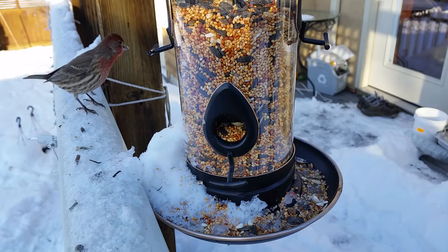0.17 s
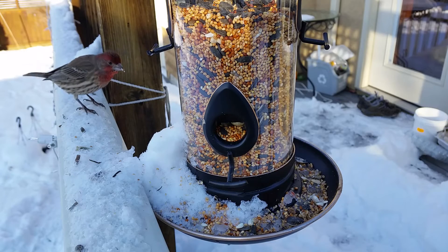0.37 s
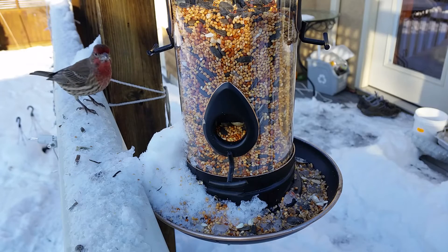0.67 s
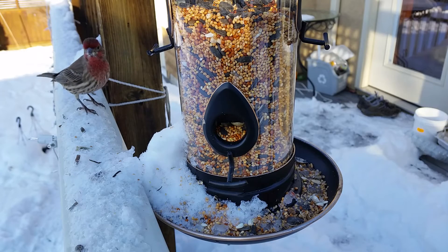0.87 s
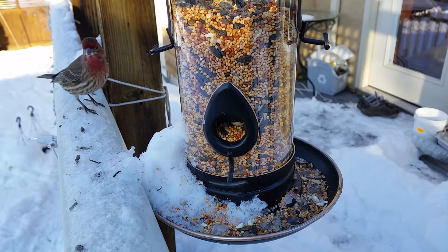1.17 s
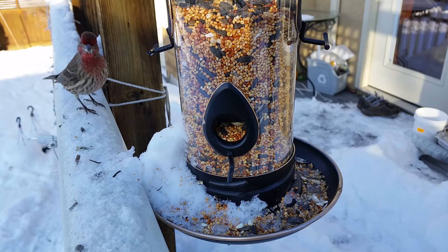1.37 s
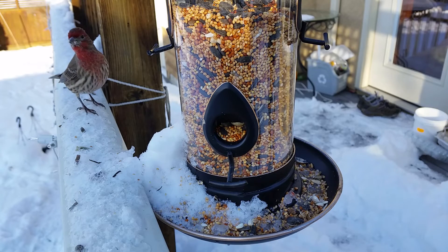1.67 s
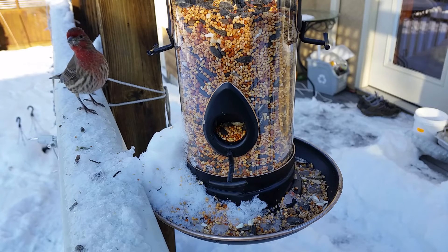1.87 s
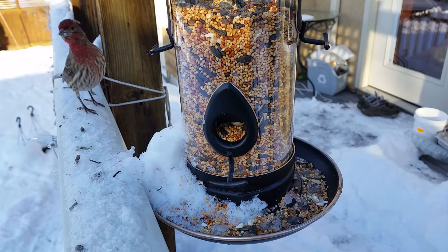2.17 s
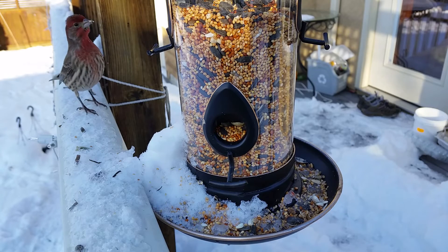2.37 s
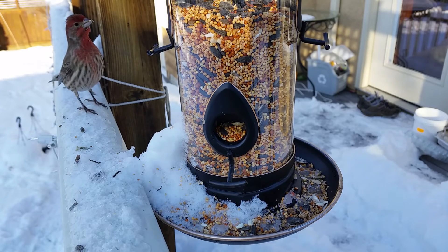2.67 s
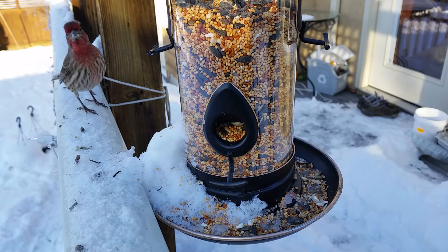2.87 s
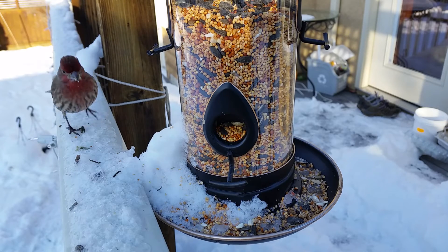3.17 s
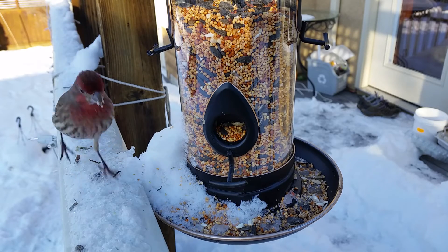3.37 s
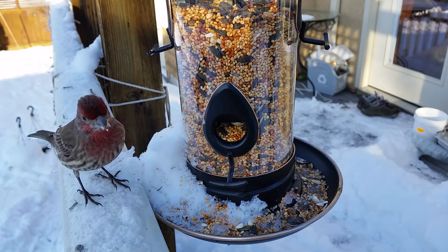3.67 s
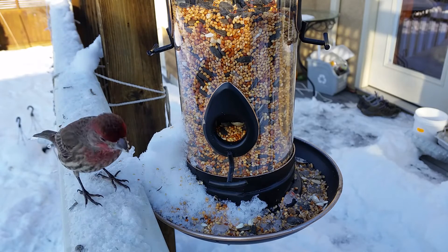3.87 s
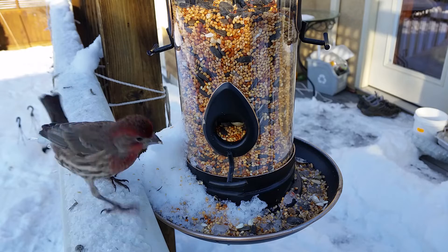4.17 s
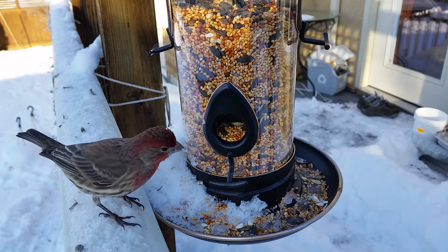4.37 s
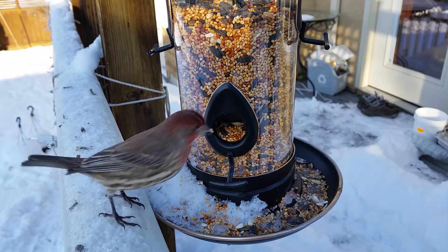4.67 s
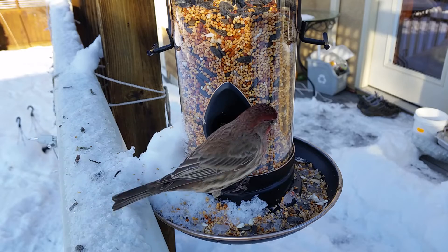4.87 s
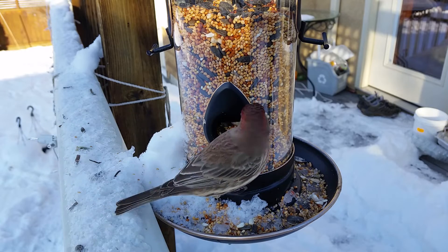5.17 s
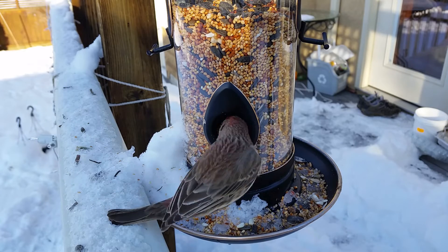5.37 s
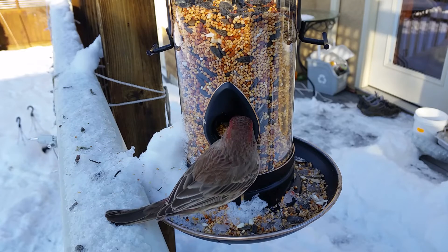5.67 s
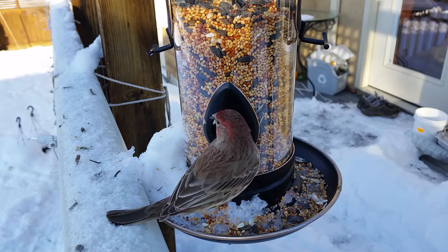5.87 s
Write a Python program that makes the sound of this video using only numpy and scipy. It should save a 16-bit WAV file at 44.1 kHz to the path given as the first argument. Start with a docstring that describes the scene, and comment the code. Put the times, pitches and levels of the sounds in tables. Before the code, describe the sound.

A smooth bass hum from an overhead plane dominates, wavering gently and growing stronger towards the end, over dull roar and soft road noise. One very brief, bright, gliding finch call sounds close by near the midpoint. Dry claw and beak ticks on rail and feeder follow, some with a tiny wire ring, plus barely audible scuffs. Far birds peep faintly last. Open yard, stereo microphone near the bird, with only a short thin echo.

```python
"""A propeller plane drones over a snowy yard from the start, its blade note sinking as it flies past.
Tyres and engine of a passing car are noise and two low tones; claw ticks are scratches that ring a rail.
At 2.9 s a close finch calls once: gliding harmonics with a second voice beating against them.
Then it hops and pecks at a seed feeder, with more ticks and soft scuffs of noise.
Near the end, from 5.6 s, far birds peep in short gliding notes."""
import sys
import numpy as np
from scipy import signal
from scipy.io import wavfile
from scipy.ndimage import uniform_filter1d

SR = 44100
rng = np.random.default_rng(int(sys.argv[2]) if len(sys.argv) > 2 else 0)


def master(y):
    """Save y as 16-bit WAV."""
    cut = np.clip(np.atleast_2d(y).T, -1, 1)
    pcm = np.round(cut * 32767)  # scale
    wavfile.write(sys.argv[1], SR, pcm.astype(np.int16))


N = 265129

# The blade note swells and fades along the air path: start_s, level_db
BLADE_LEVEL = [(0.04, -23), (0.24, -20.5), (0.5, -21.5), (0.75, -18), (0.92, -20.5), (1.52, -19),
               (1.69, -27.5), (2.07, -20), (2.29, -22.5), (2.32, -20.5), (3.06, -21.5), (3.23, -19),
               (3.49, -23), (3.62, -20), (3.95, -21.5), (4.18, -17), (4.4, -18.5), (5.21, -14.5),
               (5.34, -12), (5.57, -13.5), (5.89, -12), (5.97, -13.5)]
# Its 2nd and 4th harmonics fade in and out as well: start_s, second_db, fourth_db
BLADE_HARMONICS = [(0, -39, -48), (.35, -32, -38), (.62, -42, -44), (.85, -33.5, -43.5), (1.15, -41.5, -54),
                   (1.4, -37.5, -39), (1.6, -38, -44.5), (1.82, -44.5, -36.5), (2.0, -29.5, -43.5),
                   (2.2, -29.5, -38), (2.42, -31.5, -52), (2.62, -39, -56), (2.7, -32.5, -59),
                   (2.8, -41.5, -58), (3.18, -33.5, -51), (3.3, -37, -62), (3.65, -39, -65),
                   (3.85, -46, -67), (4.0, -38, -61), (4.4, -38, -50.5), (4.6, -40, -66),
                   (4.8, -36.5, -63.5), (5.1, -37.5, -48), (5.4, -33.5, -62), (5.65, -43.5, -58.5),
                   (6.01, -56.5, -41)]
# The plane's broad roar, before a common trim: start_s, level_db, top_weight_db
ROAR = [(0, -33, 0.5), (.33, -28.5, 0.5), (.7, -27, -3.5), (1.0, -28, -1.5), (1.45, -26, -1),
        (1.75, -28, -0.5), (2.2, -29.5, 4.5), (2.7, -35.5, 5), (3.2, -33, 3.5), (3.8, -32.5, 2.5),
        (4.4, -28, -0.5), (5.0, -31, 1.5), (5.35, -27.5, -3.5), (5.7, -33, 1.5), (6.01, -26, -3.5)]
# Shape of the roar's spectrum: frequency_hz, relative_db (per Hz)
ROAR_COLOUR = [(25, -38), (45, -17.5), (80, -3), (140, -7), (190, 1), (250, -4), (320, -4.5), (450, -11.5),
               (620, -14), (900, -24), (1500, -37), (3000, -49.5), (6000, -69.5)]
# Tyres of the passing car, before a common trim: start_s, level_db, tread_band_db
TYRES = [(0, -60.5, 3.5), (.75, -57.5, -3), (1.4, -57, -3.5), (2.05, -51.5, -1), (3.04, -49, 8),
         (3.61, -50, 6), (3.91, -52.5, 6), (4.39, -52, 3), (4.78, -54, 2), (5.73, -58.5, 4),
         (6.01, -62, 8.5)]
# Shape of the tyre spectrum: frequency_hz, relative_db (per Hz)
TYRE_COLOUR = [(300, -29.5), (550, -4.5), (750, -3.5), (1100, -6.5), (1600, -7.5), (2400, -13),
               (3500, -18.5), (5000, -24.5), (8000, -39), (14000, -53)]
# The car's engine, which ends slower than it began: start_s, firing_rate_hz, level_db
ENGINE = [(0, 40.4, -48), (.6, 41.8, -42.5), (1.2, 43.4, -43.5), (2.5, 41.5, -42), (3.15, 37.4, -43),
          (3.8, 35.3, -42), (4.25, 30.2, -49), (5.1, 28.3, -49), (6.01, 27.15, -51.5)]
# Shape of the microphone hiss: frequency_hz, relative_db (per Hz)
HISS_COLOUR = [(1500, -7.5), (4000, 3), (8000, -0.5), (13000, -6.5), (14300, -5.5), (14900, -15.5),
               (15600, -20)]
# How alike the noise is in both channels: frequency_hz, likeness (1 same, 0 unrelated, below 0 opposed)
LIKENESS = [(30, 1), (60, 0.83), (290, 0.92), (640, 0.76), (1400, 0.53), (3100, 0.072), (6800, -0.17),
            (15000, -0.2)]
# How much louder the noise is on the left: frequency_hz, left_minus_right_db
NOISE_LEAN = [(30, 0), (60, 1.5), (200, -0.5), (400, 2), (700, 2.5), (1300, 1.4), (2400, 1.5), (5000, 0.5),
              (10000, 0.5)]
# The finch's call glides down, then holds:
# start_s, pitch_hz, first_harmonic_db, second_harmonic_db, drop_per_higher_harmonic_db
CALL = [(2.881, 3994, -65, -78, 15), (2.887, 3830, -45, -58, 25), (2.895, 3640, -44, -55, 17),
        (2.905, 3496, -38, -49, 6), (2.911, 3310, -25.5, -48, 5), (2.918, 3057, -23.5, -50, 1),
        (2.926, 2884, -34, -34.5, 7), (2.934, 2760, -33, -36, 10), (2.938, 2710, -29, -35, 9),
        (2.945, 2750, -57, -38, 5.5), (2.953, 2760, -34, -36, 15), (2.957, 2720, -37, -43, 14),
        (2.964, 2820, -50, -46, 18), (2.968, 2790, -49, -54, 25), (2.974, 2750, -52, -64, 27),
        (2.988, 2770, -48, -64, 25), (2.997, 2750, -64, -78, 25)]
# The other side of its voice box, beating against the first: start_s, pitch_hz, level_db
SECOND_VOICE = [(2.887, 3100, -60), (2.893, 3100, -47), (2.901, 3130, -34), (2.908, 3093, -27.5),
                (2.914, 3040, -30), (2.921, 2950, -50)]
# Far birds: start_s, length_s, first_pitch_hz, last_pitch_hz, level_db
PEEPS = [(5.617, 0.027, 4640, 4500, -61.5), (5.63, 0.017, 4000, 3990, -59.5),
         (5.856, 0.029, 3420, 3100, -62.5), (5.886, .016, 2880, 2980, -63),
         (5.885, 0.022, 3150, 3700, -58.5), (5.908, 0.035, 3870, 4000, -65)]
# Claws and beak; low and high parts are weighed against the middle part:
# start_s, level_db, low_part_db, high_part_db, left_minus_right_db, fade_s, wire_ring_db
TICKS = [(0.553, -44, -14, -9, 3, 0.0036, -32), (0.5574, -38.5, -2, -5.5, 0, 0.0039, -30),
         (0.564, -53, 2, -5, 0, 0.0061, -25), (1.485, -56, -6, 2, 1, 0.0025, -28),
         (1.554, -53, -7, -15, 0, 0.0021, -29), (2.006, -56, -10, -1, 1, .0015, -30),
         (2.236, -39.5, -12, -14, 0, 0.0027, -17), (3.0805, -51, -20, -10, 5, 0.0015, 3),
         (3.0855, -59, -20, 9, 6, .0012, -32), (3.1432, -45, 4, -20, 5, 0.0013, -20),
         (3.145, -40, 4, -13, 7, 0.0011, -6), (3.322, -56, -13, -10, 0, 0.004, -19),
         (3.328, -50.5, -6, -8, 8, 0.0036, 0), (3.465, -57, -11, -10, 8, .0015, 3),
         (3.467, -55.5, -11, -4, 8, .002, 9), (3.5015, -49.5, 1, -18, 7, 0.0018, 3),
         (3.6133, -48, -6, -10, 5, .0015, -6), (4.2705, -53, -4, -14, 1, 0.0023, 3),
         (4.277, -61, -4, 5, 3, .002, -12), (4.284, -58, -3, 4, 3, .002, -10),
         (4.306, -52, 6, -8, 8, 0.003, -4), (4.312, -59, -5, 7, 3, .0015, -20),
         (4.8195, -48.5, 10.5, -16, 1, 0.0022, -34), (4.8265, -61, 16, -22, 4, 0.0017, -34),
         (5.45, -59, -9, 6, 1.5, 0.00143, -32), (5.493, -49, -9, -6, -1, 0.0013, -30),
         (5.499, -64, -5, 8, 0.1, .0015, -32), (5.55, -45, -10, -6, 3, 0.0018, -30),
         (5.553, -53, 1, 3, 1, 0.0025, -29.5), (5.597, -42.5, -9, -9, 3.5, 0.001, -30),
         (5.648, -49, 5, -9.5, 4, 0.0033, -26.5), (5.655, -60.5, -4, 5, -4, .002, -28),
         (5.701, -54, -8.5, -1, 9.5, 0.0013, -30.5)]
# Low, middle and high part of a tick: lowest_hz, highest_hz
TICK_PARTS = [(1500, 4300), (3600, 7500), (6500, 13500)]
# The rail and tray ring briefly under each tick: frequency_hz, width_hz, strength_db
RAIL_RESONANCES = [(1820, 260, -5), (2500, 600, 0), (3300, 700, -5), (4250, 400, 1), (5380, 800, 0),
                   (6900, 900, -5)]
# Feet and feathers scuffing snow and seed: middle_s, level_db, half_length_s
SCUFFS = [(3.173, -67, 0.0091), (3.332, -58.5, 0.008), (3.474, -61, .01), (3.508, -64, .008),
          (4.279, -67, 0.02), (4.313, -65, 0.012), (5.365, -63, 0.026), (5.47, -69, .04),
          (5.535, -62, .015)]
# Brief swells of narrow noise: middle_s, level_db, half_length_s, lowest_hz, highest_hz
SWELLS = [(0.9, -46.5, 0.15, 450, 890), (1.4, -44, 0.13, 183, 188), (2.3, -36.5, 0.37, 179, 194),
          (2.179, -44.5, 0.034, 990, 1990), (3.62, -43, 0.13, 512, 696), (3.545, -40.5, 0.032, 790, 910),
          (3.695, -37, 0.045, 870, 960), (4.15, -44, 0.047, 860, 994), (4.228, -48, 0.054, 997, 2150),
          (4.27, -57, 0.067, 1800, 5160), (4.45, -63, 0.33, 2195, 2290), (5.25, -65.5, .25, 2810, 3090)]

# Plane: note at rest, speed over sound speed, moment it is nearest, its distance over its speed
BLADE_HZ, MACH, NEAREST_S, PASS_S = 102.2, .14, 2.9, 4.5
THIRD_DB, THIRD_FADING_DB = -49, 1.5
HARMONIC_BLUR = .055  # turns of wandering phase
LOW_GUST_DB, TREAD_GUST_DB = -1.5, 0.5
TREAD_HZ, TREAD_OCTAVES = 950, 0.22
HISS_DB = -61
# The engine's second order swells as the car is near
SECOND_ORDER_DB, SECOND_ORDER_NEAR_DB, SECOND_ORDER_S, SECOND_ORDER_SPAN_S = -54.5, 18, 3.2, 0.7
RASP = .09  # turns of phase that roughen the harmonics in a fast glide
FLUTTER = .13  # depth of the tremble in a note's strength
CALL_TOP_HZ, CALL_TOP_DB_PER_KHZ = 12500, -4  # harmonics above this are weak
VOICE_SECOND_HARMONIC_DB = -23
FENCE_ECHO_S, FENCE_ECHO_DB = 0.01, -5  # the fence throws the call straight back
PEEP_ENDS_DB, NOTE_EASE = -7, 1.8
SNAP = .75  # the hard contact against the scratch around it
WIRE_HZ, WIRE_WIDTH_HZ = 4210, 280
PING_T60_S, RATTLE_T60_S, RATTLE_DB = .02, 0.14, -6.5  # the wire pings, then rattles on more quietly
EDGE_HZ = 15500


def amp(db):
    """Turn decibels into a plain gain."""
    return 10 ** (np.asarray(db) / 20)


def evened(x):
    """Scale a signal to an rms of 1."""
    return x / np.sqrt(np.mean(x ** 2) + 1e-20)


def smooth_twice(x, size):
    """Run the same moving average twice."""
    return uniform_filter1d(uniform_filter1d(x, size), size)


def read(points, hz):
    """Read a curve between its points, evenly in pitch."""
    f, value = np.transpose(points)
    return np.interp(np.log(hz + 1), np.log(f + 1), value)


def along(rows, t):
    """Read every column of a table at the times t."""
    s, *columns = np.transpose(rows)
    return [np.interp(t, s, column) for column in columns]


def band(x, lo_hz, hi_hz):
    """Keep only the frequencies between two edges."""
    return signal.sosfilt(signal.butter(2, [lo_hz, hi_hz], "band", fs=SR, output="sos"), x)


def sides(pan_db):
    """Left and right gains that differ by pan_db."""
    return amp([[pan_db / 2], [-pan_db / 2]])


def add(mix, s, sound):
    """Add a sound to the mix from second s, cut at the end."""
    part = mix[..., round(s * SR):][..., :sound.shape[-1]]
    part += sound[..., :part.shape[-1]]


def bump(t, middle_s, span_s):
    """A smooth hill in time, 1 at its top."""
    return np.exp(-((t - middle_s) / span_s) ** 2)


def wobble(span_s):
    """Slow random change with an rms of 1."""
    return evened(smooth_twice(rng.standard_normal(N), round(span_s * SR)))


def partials(hz, multiples, levels_db, blur=0):
    """Turning phasors on multiples of one pitch curve, each with an rms level curve; blur wanders the phase."""
    turns = np.cumsum(hz) / SR
    total = 0
    for k, db in zip(multiples, levels_db):
        phase = k * turns + (k - 1) * blur + rng.random()
        total = total + np.sqrt(2) * amp(db) * np.exp(2j * np.pi * phase)
    return total


def propeller():
    """A nearly pure blade note sinks by the Doppler law; turbulent air makes it flutter a little."""
    t = np.arange(N) / SR
    gone = (t - NEAREST_S) / PASS_S
    hz = BLADE_HZ / (1 + MACH * gone / np.sqrt(1 + gone ** 2))
    level_db, = along(BLADE_LEVEL, t)
    second_db, fourth_db = along(BLADE_HARMONICS, t)
    levels = [level_db + 0.22 * wobble(0.012),
              second_db + 0.53 * wobble(0.048),
              THIRD_DB + THIRD_FADING_DB * wobble(0.098),
              fourth_db + 3.5 * wobble(0.024)]
    blur = HARMONIC_BLUR * wobble(0.068)
    note = partials(hz + 0.34 * wobble(0.035), range(1, 5), levels, blur=blur)
    crossing = t / t[-1]  # the plane drifts from the left towards the middle
    lead = np.exp(.5j * (.39 - .2 * crossing)) * amp(.5 * (1 - crossing))
    return np.array([(note * lead).real, (note / lead).real])


def broad_noise():
    """Roar, tyres and microphone hiss share one field of random short-time spectra."""
    frames, hz = N // 512 + 5, np.fft.rfftfreq(2048, 1 / SR)
    t = np.arange(frames) * 512 / SR
    a, b, c, d, patches, streaks = rng.standard_normal((frames, 1025, 6)).T
    left, other = a + 1j * b, c + 1j * d
    patches = evened(uniform_filter1d(uniform_filter1d(patches, 8, 0), 6, 1))  # gusts in the air path
    streaks = evened(uniform_filter1d(uniform_filter1d(streaks, 3, 0), 24, 1))  # narrow bands that linger
    low_gust, tread_gust = (evened(uniform_filter1d(g, size=5)) for g in rng.standard_normal((2, frames)))

    roar_db, top_db = along(ROAR, t)
    low = 1 / (1 + (hz / 150) ** 4)
    top = 1 / (1 + (400 / (hz + 1)) ** 4)
    roar_db = roar_db + np.outer(low, LOW_GUST_DB * low_gust) + np.outer(top, top_db)
    roar_db = roar_db + 0.67 * patches + 2.38 * streaks - 4.0
    roar = evened(amp(read(ROAR_COLOUR, hz)))[:, None] * amp(roar_db)

    tyre_db, tread_db = along(TYRES, t)
    tread_db = tread_db + TREAD_GUST_DB * tread_gust
    tread = np.exp(-.5 * (np.log2((hz + 1) / TREAD_HZ) / TREAD_OCTAVES) ** 2)
    tyre_db = tyre_db + np.outer(tread, tread_db) + 1.1 * patches + 1.9 * streaks + 5.5
    tyres = evened(amp(read(TYRE_COLOUR, hz)))[:, None] * amp(tyre_db)

    hiss = evened(amp(read(HISS_COLOUR, hz)))[:, None] * amp(HISS_DB)
    same = np.clip(read(LIKENESS, hz), -1, 1)[:, None]
    lean = amp(read(NOISE_LEAN, hz) / 2)[:, None]
    lean = lean * np.exp(.15j / (1 + (hz[:, None] / 150) ** 2))  # the left leads a little in the bass
    right = same * left + np.sqrt(1 - same ** 2) * other
    field = np.array([left * lean, right / lean])
    unit = np.sqrt(np.mean(signal.istft(left, nperseg=2048, noverlap=1536)[1] ** 2))
    strength = np.sqrt(roar ** 2 + tyres ** 2 + hiss ** 2)
    return signal.istft(field * strength, nperseg=2048, noverlap=1536)[1][:, :N] / unit


def engine():
    """Two low firing orders with uneven strokes."""
    t = np.arange(N) / SR
    hz, first_db = along(ENGINE, t)
    second_db = SECOND_ORDER_DB + SECOND_ORDER_NEAR_DB * bump(t, SECOND_ORDER_S, SECOND_ORDER_SPAN_S)
    levels = [db + 2.0 * wobble(0.0051) for db in (first_db, second_db)]
    note = partials(hz + .5 * wobble(0.052), (1, 2), levels)
    return (note * np.exp([[.2j], [-.2j]])).real  # the left leads a little


def whistle(rows, jitter=0.018):
    """One bird note: harmonics on a gliding pitch; pitch and strength tremble, pitch most in a fast glide."""
    t = np.arange(rows[0][0], rows[-1][0], 1 / SR)
    hz, *levels = along(rows, t)
    hz = uniform_filter1d(hz, size=300, mode="nearest")  # the glide has no corners
    tremble, grain = (evened(smooth_twice(z, 32)) for z in rng.standard_normal((2, len(t))))
    glide = np.clip(uniform_filter1d(abs(np.gradient(hz)), size=200) * SR / 30000, .25, 1)
    shaky_hz = hz * (1 + jitter * glide * tremble)
    tone = partials(shaky_hz, range(1, len(levels) + 1), levels, blur=RASP * glide ** 2 * grain).real
    return t[0], tone * (1 + FLUTTER * grain) * signal.windows.tukey(len(t), .1)


def arch(start, length, from_hz, to_hz, level_db, ends_db):
    """Rows for a note whose pitch glides and settles, and whose level is lower at both ends."""
    u = np.linspace(0, 1, num=21)
    hz = to_hz + (1 - u) ** NOTE_EASE * (from_hz - to_hz)
    return np.transpose([start + u * length, hz, level_db + ends_db * (2 * u ** 0.97 - 1) ** 2])


def yard(x):
    """Fence and house wall return a short, thin, dull tail: scattered echoes that die away."""
    t = np.arange(round(.15 * SR)) / SR
    taps = rng.standard_normal((2, len(t))) * (rng.random((2, len(t))) < .03)
    taps = taps * amp(-60 * t / 0.086) * (t > .004)
    taps = band(band(taps + 0.36 * taps[::-1], 1800, 3800), 1800, 3800)
    return signal.oaconvolve(x[None], taps / np.linalg.norm(taps[0]), axes=1)[:, :N]


def birds():
    """The near finch sings with two voices and turns its head as it calls; far birds peep."""
    main, second, far = np.zeros((3, N))
    s, hz, first_db, second_db, drop_db = np.transpose(CALL)
    upper_db = []
    for k in range(4):
        over_khz = np.maximum((k + 2) * hz - CALL_TOP_HZ, 0) / 1e3
        upper_db.append(second_db - k * drop_db + CALL_TOP_DB_PER_KHZ * over_khz)
    add(main, *whistle(np.transpose([s, hz, first_db] + upper_db), jitter=0.024))
    voice = np.array(SECOND_VOICE)
    add(second, *whistle(np.c_[voice, voice[:, 2] + VOICE_SECOND_HARMONIC_DB], jitter=0.008))
    near = main + second + band(4.0 * main * second, 5000, 13000)  # the two voices mix into sum tones
    near *= 1 + 0.064 * evened(uniform_filter1d(rng.standard_normal(N), size=10))  # breath of air in the note
    pan_db = np.interp(np.arange(N) / SR, [2.905, 2.93], [0.3, 5])  # the head turns
    heard = np.array([near * amp(pan_db / 2), np.roll(near * amp(-pan_db / 2), shift=1)])
    echo = band(band(near, 3000, 4500), 2950, 4800)
    add(heard, FENCE_ECHO_S, amp(FENCE_ECHO_DB) * echo * sides(-4.0))
    for row in PEEPS:
        add(far, *whistle(arch(*row, PEEP_ENDS_DB), jitter=.022))
    return heard + amp(-16.5) * yard(near) + far * sides(1.4) + amp(-15) * yard(far)


def wire_ring(grit, t):
    """The perch wire pings as a fading tone and rattles on as a narrow band of noise."""
    rattle = evened(band(grit, WIRE_HZ - WIRE_WIDTH_HZ / 2, WIRE_HZ + WIRE_WIDTH_HZ / 2))
    rattle = rattle * amp(RATTLE_DB - 60 * t / RATTLE_T60_S)
    ping = 2 * np.sin(2 * np.pi * WIRE_HZ * t) * amp(-60 * t / PING_T60_S) * (1 - np.exp(-t / 0.00029))
    return rattle + ping


def ticks():
    """Short scratches of claw and beak knock the rail, weighted in three bands; some set a wire rattling."""
    out, t = np.zeros((2, N)), np.arange(3000) / SR
    for s, db, low_db, high_db, pan_db, fade_s, ring_db in TICKS:
        grit = rng.standard_normal(len(t)) + 0.35 * rng.standard_normal((2, len(t)))
        ring = wire_ring(grit, t)
        shape = np.exp(-(t / max(fade_s, .0005)) ** 2) * (1 - np.exp(-t / 0.0005))
        contact = signal.unit_impulse(len(t), idx=round(fade_s * SR / 4))
        scratch = grit * shape + SNAP * np.linalg.norm(shape) * contact
        knock = scratch + sum(amp(g) * band(scratch, f - w / 2, f + w / 2) for f, w, g in RAIL_RESONANCES)
        low, middle, high = (evened(band(band(knock, *edges), *edges)) for edges in TICK_PARTS)
        knock = (amp(low_db) * low + middle + amp(high_db) * high) * np.sqrt(np.mean(shape ** 2))
        add(out, s, amp(db) * sides(pan_db) * (knock + amp(ring_db) * ring))
    return out


def puffs(rows, grain_db):
    """Bands of noise that rise and fall softly; grain_db makes them crumbly."""
    out = np.zeros((2, N))
    t = np.arange(-.4, .4, 1 / SR)
    for s, db, half_length_s, lo_hz, hi_hz in rows:
        noise = rng.standard_normal(len(t)) + 0.31 * rng.standard_normal((2, len(t)))
        noise *= amp(grain_db * evened(uniform_filter1d(rng.standard_normal(len(t)), size=60)))
        add(out, s - .4, amp(db) * evened(band(noise, lo_hz, hi_hz)) * bump(t, 0, half_length_s))
    return out


def scuffs():
    """Feet and feathers brush snow and seed: crumbly puffs of high noise."""
    return puffs([(*row, 5500, 14000) for row in SCUFFS], 3.0) * sides(2.5)


def swells():
    """Narrow bands of noise rise and fall briefly, a little to the left."""
    return puffs(SWELLS, .5) * sides(2.0)


def scene():
    """Add up plane, street, birds and feeder."""
    street = broad_noise() + engine() + swells()
    return propeller() + street + birds() + ticks() + scuffs()


def record(dry):
    """The band limit of the recorder: a steep low-pass filter."""
    return signal.oaconvolve(dry, signal.firwin(511, EDGE_HZ, window=("kaiser", 9), fs=SR)[None], "same")


dry = scene()
out = record(dry)
master(out)
```